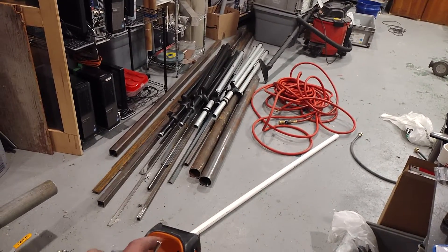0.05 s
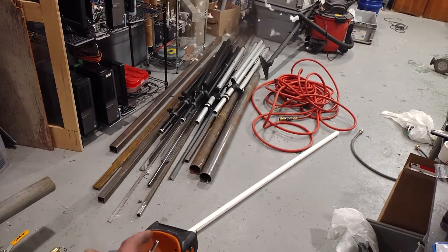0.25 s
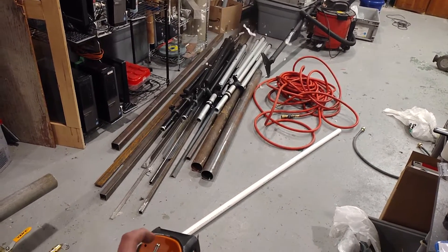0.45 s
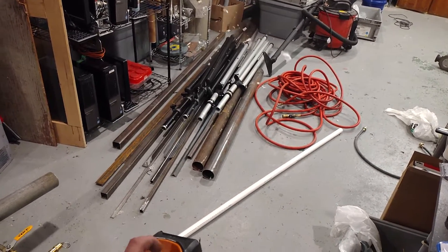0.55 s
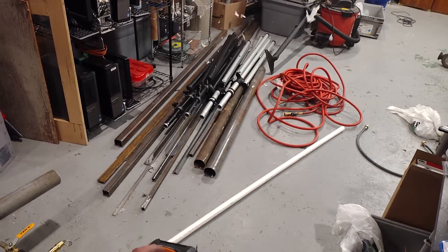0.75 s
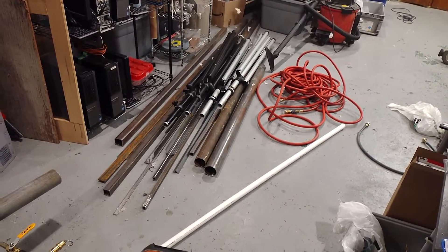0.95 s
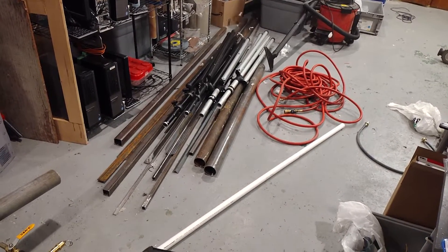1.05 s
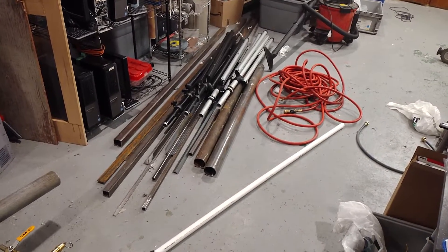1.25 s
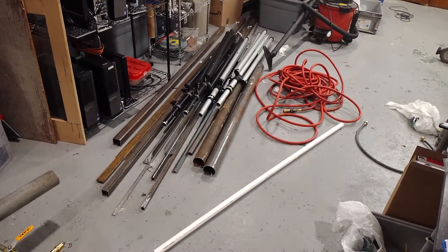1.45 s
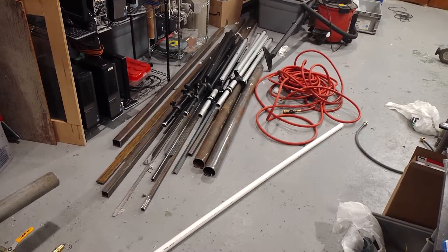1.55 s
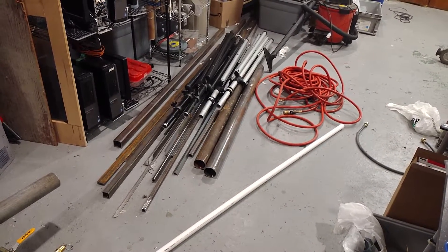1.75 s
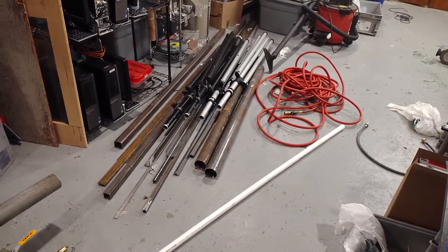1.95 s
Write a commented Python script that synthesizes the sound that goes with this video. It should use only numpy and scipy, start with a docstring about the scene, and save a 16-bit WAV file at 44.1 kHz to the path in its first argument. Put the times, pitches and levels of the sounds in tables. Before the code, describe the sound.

A compressed-air launcher clicks and fires with a sharp pop and a rushing blast that darkens into a pipe rumble. Steel rings and light debris ticks down, then a valve snaps and vents a brighter hiss, close by in a workshop.

```python
"""Compressed-air launcher in a workshop

A trigger valve snaps and a pressure pulse leaves the barrel. The turbulent blast darkens into a pipe
rumble as the tank empties. A struck steel part rings, its close modes beating, and light debris lands.
The valve snaps again and vents a second, brighter hiss. Faint room noise and hum lie underneath."""
import sys
import numpy as np
from scipy import signal
from scipy.fft import rfft, irfft, next_fast_len
from scipy.io import wavfile
from scipy.ndimage import map_coordinates

SR = 44100
rng = np.random.default_rng(int(sys.argv[2]) if len(sys.argv) > 2 else 0)


def materialize(psi):
    """Save the field psi as 16-bit PCM at rate SR to the path in sys.argv[1].

    A 1-D psi becomes a single channel; in a 2-D psi each row is a channel.
    """
    bounded = np.clip(np.atleast_2d(psi).T, -1, 1)
    quanta = np.round(bounded * 32767).astype(np.int16)
    wavfile.write(sys.argv[1], SR, quanta)


N = 88200


def amp(db):
    """Amplitude ratio of a level in decibels."""
    return 10 ** (np.asarray(db) / 20)


def along(table, hz, column=1):
    """Interpolation of one column on a log-frequency axis."""
    columns = np.transpose(table)
    return np.interp(np.log(hz + 1), np.log(columns[0] + 1), columns[column])


def since(start):
    """Seconds elapsed since start, zero before."""
    return np.maximum(np.arange(N) / SR - start, 0)


def decay(start, t60, attack=.0008):
    """Exponential damping after a blow: 60 dB lost in t60 seconds."""
    return amp(-60 * since(start) / t60) * (1 - np.exp(-since(start) / attack))


def sine(hz, start, phase=0):
    """Simple harmonic motion from start, phase in radians."""
    return np.sin(2 * np.pi * hz * since(start) + phase)


def wobble(rate):
    """Smooth random modulation, rate knots a second."""
    return map_coordinates(rng.standard_normal(1024), [since(0) * rate], mode="wrap")


def pan(db):
    """Stereo gains for a left-minus-right level difference."""
    return amp(np.array([[.5], [-.5]]) * db)


def resonances(peaks, hz):
    """Gain in dB of a set of Lorentzian peaks."""
    return sum(db / (1 + (2 * (hz - centre) / width) ** 2) for centre, width, db in peaks)


def filtered(x, response):
    """Linear filtering: the spectrum times a frequency response."""
    size = next_fast_len(N + SR // 2)
    return irfft(rfft(x, size) * response(np.fft.rfftfreq(size, 1 / SR)), size)[..., :N]


def damped(x, loss_db):
    """Attenuation that depends on frequency and time."""
    hz, t, spectra = signal.stft(x, SR, nperseg=256)
    return signal.istft(spectra * amp(-loss_db(hz[:, None], t)), SR, nperseg=256)[1][:, :N]


# Each row: frequency in Hz, correlation of left and right.
COHERENCE = [(60, .96), (150, .87), (300, .82), (450, .3), (700, -.1), (2000, 0)]
def noise(colour_db, balance=None):
    """Stereo noise of rms 1 with a given spectral shape, coherent only at long wavelengths."""
    def mid_side_gains(hz):
        angle = np.arccos(np.clip(along(COHERENCE, hz), -1, 1)) / 2
        return amp(colour_db(hz)) * [np.cos(angle), np.sin(angle)]
    mid, side = filtered(rng.standard_normal((2, N)), mid_side_gains)
    pair = np.array([mid + side, mid - side])
    if balance:
        pair = filtered(pair, lambda hz: pan(along(balance, hz)))
    return pair / np.sqrt(np.mean(pair ** 2) + 1e-20)


def band(centre, octaves):
    """Band-pass noise, at half power the given octaves either side of the centre."""
    return noise(lambda hz: -10 * np.log10(1 + (np.log2((hz + 1) / centre) / octaves) ** 4))


# Each row: frequency in Hz, reverberation time in seconds.
REVERB_TIMES = [(100, .5), (1000, .4), (5000, .28), (15000, .18)]
def room(direct, wet_db):
    """Reverberation: a diffuse tail follows the direct sound, its treble dying first."""
    tail = damped(noise(np.zeros_like), lambda hz, t: 60 * t / along(REVERB_TIMES, hz))[:, :SR // 2]
    tail[:, :SR // 250] = 0  # reflections begin after 4 ms
    tail /= np.linalg.norm(tail[0])
    return direct + amp(wet_db) * signal.fftconvolve(direct * np.ones((2, 1)), tail, axes=1)[:, :N]


# Each row: frequency in Hz, relative spectral density in dB.
AMBIENT_SPECTRUM = [(30, -38), (110, -9), (260, -4), (640, -11), (1900, -18.5), (3900, -21),
                    (5300, -29), (15500, -35)]
def background():
    """Noise floor: steady broadband room noise and a tone of mains hum."""
    return amp(-59.3) * noise(lambda hz: along(AMBIENT_SPECTRUM, hz)) + amp(-73) * sine(hz=120, start=0)


# Each row: start in seconds, level in dB, t60 in seconds, centre in Hz, half-width in octaves. The first row is
# the blow that sets the steel part ringing.
IMPACTS = [(.533, -35, .22, 13000, .25), (.647, -43, .08, 7000, .7), (.666, -39, .22, 4500, 1.2),
           (.847, -39, .1, 6500, .3), (.848, -41.5, .12, 6500, 1.4), (.999, -40, .2, 12000, 1),
           (1.021, -41, .08, 7000, 1), (1.3214, -59, .14, 6000, 1)]
def debris():
    """Impact noise: the first bright tick is the blow on the steel part, and each light piece then lands with a
    bright, quickly damped tick."""
    return sum(amp(db) * decay(start, t60) * band(centre, octaves)
               for start, db, t60, centre, octaves in IMPACTS)


# Each row: start in seconds, level in dB, attack and t60 in seconds, frequency in Hz.
BUMPS = [(1.105, -31.5, .03, .28, 134), (1.523, -36, .001, .1, 115)]
def thuds():
    """Damped bass oscillations: a distant bump, then the valve seating."""
    return sum(amp(db) * decay(start, t60, attack) * sine(hz, start)
               for start, db, attack, t60, hz in BUMPS)


# Modes of the steel part. Each row: frequency in Hz, level in dB, t60 in seconds.
CLOSE_MODES = [(1896.8, -34.3, 2.0), (1899.5, -37.1, 2.26), (1912.5, -36.9, 2.26)]
SPREAD_MODES = [(1184, -32, .5), (1389, -37, 1.2), (1523, -37, 1.5), (2541, -37, 1.2), (4620, -55, 2)]
def steel(strike=.533):
    """Free vibration: three close modes interfere in uneven beats while most others die sooner."""
    beating = sum(amp(db) * decay(strike, t60) * sine(hz, strike) for hz, db, t60 in CLOSE_MODES)
    clang = sum(amp(db) * decay(strike, t60) * sine(hz, strike, np.pi * rng.random((2, 1)))
                for hz, db, t60 in SPREAD_MODES)
    return beating * pan(-7) + clang


# Each row: frequency in Hz, relative spectral density in dB.
RUMBLE_SPECTRUM = [(25, -30), (65, -8), (150, 1), (290, -5), (450, -11), (700, -16.5), (1200, -15),
                   (2600, -19), (4500, -34), (15000, -48)]
# Each row: frequency in Hz, level in dB, t60 in seconds.
BARREL_MODES = [(122, -28, 1.25), (235, -25, .7)]
def barrel_rumble(start=.41, peak=.52, fade_db_per_s=34):
    """Pipe resonance: the slowing air swells into a rumble and drives the barrel's low modes."""
    swell = np.minimum(since(start) / (peak - start), 1)
    roar = amp(-26 - fade_db_per_s * since(peak)) * noise(lambda hz: along(RUMBLE_SPECTRUM, hz))
    drone = 0
    for hz, db, t60 in BARREL_MODES:
        envelope = amp(db - 60 * since(peak) / t60 + 2.5 * wobble(rate=14))
        drone += envelope * sine(hz, start, phase=.5 * wobble(rate=14))
    return swell * (roar + drone)


# Each row: frequency in Hz, relative spectral density in dB.
SNAP_SPECTRUM = [(60, -10), (350, -2), (850, -15), (1700, -3), (2600, 2), (7000, -3), (10000, -1),
                 (15500, -5)]
# Each row: centre and bandwidth in Hz, boost in dB.
VALVE_RESONANCES = [(4300, 600, 6), (5400, 350, 4), (10400, 1300, 6)]
# Each row: start in seconds, level in dB, t60 in seconds, cutoff in Hz, ring in Hz, ring level in dB.
VALVE_SNAPS = [(.1945, -45, .03, 3000, 3500, -52), (.2078, -19, .035, 14000, 3000, -27.5),
               (1.4795, -30.5, .035, 2600, 2200, -46), (1.4865, -34.5, .16, 4000, 10400, -43),
               (1.526, -28, .08, 4000, 4500, -36)]
def valve():
    """Impulsive excitation: each movement of the valve snaps and leaves its metal ringing."""
    def snap(cutoff):
        return noise(lambda hz: along(SNAP_SPECTRUM, hz) + resonances(VALVE_RESONANCES, hz)
                     - 10 * np.log10(1 + (hz / cutoff) ** 2))
    snaps = sum(amp(db) * decay(start, t60, attack=.0003) * snap(cutoff)
                for start, db, t60, cutoff, _, _ in VALVE_SNAPS)
    ringing = sum(amp(db) * decay(start, t60=.14) * band(hz, octaves=.2)
                  for start, *_, hz, db in VALVE_SNAPS)
    return snaps + ringing


def jet(spectrum, balance, start, attack, hold, db, peaks=()):
    """Turbulent jet noise: it opens fast, sags and darkens with the pressure, then dies away."""
    def loss_db(hz, t):
        sag = along(spectrum, hz, column=2) * np.clip(t - start, 0, hold)
        release = along(spectrum, hz, column=3) * np.maximum(t - start - hold, 0)
        return sag + release
    rush = noise(lambda hz: along(spectrum, hz) + resonances(peaks, hz), balance)
    opening = np.minimum(since(start) / attack, 1)
    flutter_db = .8 * wobble(rate=70)
    return damped(rush, loss_db) * opening * amp(db + flutter_db)


# Each row: frequency in Hz, relative spectral density in dB, sag and release in dB per second.
VENT_SPECTRUM = [(50, -34, 10, 20), (170, -23, 15, 20), (450, -7.5, 68, 110), (680, -18, 32, 110),
                 (1600, -6.5, 44, 180), (2200, -1.5, 52, 220), (4400, -.5, 61, 310), (7800, -2.5, 58, 340),
                 (9000, -8, 60, 400), (15500, -9, 72, 540)]
# Each row: frequency in Hz, left minus right in dB.
VENT_BALANCE = [(400, 1), (1400, 0), (2300, -5), (4500, -4), (5800, 3), (9000, 7), (15000, 3)]
# Each row: centre and bandwidth in Hz, boost in dB.
PORT_RESONANCES = [(2225, 85, 7.5), (3700, 130, 6), (3880, 45, 7), (4550, 140, 7.5), (4735, 45, 8),
                   (7630, 60, 6), (7880, 60, 4)]
def vent(start=1.53, surge_db=3.7, surge_s=.088):
    """Resonant filtering: the vent port colours a bright jet that opens with a surge."""
    hiss = jet(VENT_SPECTRUM, VENT_BALANCE, start, attack=.013, hold=.212, db=-14.2,
               peaks=PORT_RESONANCES)
    surge = amp(surge_db * np.exp(-(since(start) / surge_s) ** 4))
    return surge * hiss * pan(-1)


# Each row: frequency in Hz, level in dB, t60 in seconds.
MUZZLE_MODES = [(100, -19, .07), (355, -11.5, .065), (462, -16, .055), (822, -12, .04)]
def muzzle_pulse(start=.2546, echo_s=.0028):
    """A compression inside a wider rarefaction reflects off the floor; the muzzle rings briefly."""
    def pressure(t):
        compression = np.exp(-.5 * (t / .001) ** 2)
        rarefaction = .34 * np.exp(-.5 * (t / .003) ** 2)
        return compression - rarefaction
    t = since(0) - start
    pop = sum(amp(db) * decay(start, t60) * sine(hz, start) for hz, db, t60 in MUZZLE_MODES)
    return amp(-2) * (pressure(t) + .25 * pressure(t - echo_s)) + pop


# Each row: frequency in Hz, relative spectral density in dB, sag and release in dB per second.
BLAST_SPECTRUM = [(40, -20, 55, 60), (120, -8, 58, 50), (190, -7, 45, 50), (320, 3, 35, 65),
                  (680, -7, 15, 85), (1100, 0, 21, 85), (2200, -2.3, 20, 95), (4000, 3, 53, 190),
                  (6500, -.5, 68, 230), (10000, -7.3, 76, 210), (15500, -12.5, 80, 170)]
# Each row: frequency in Hz, left minus right in dB.
BLAST_BALANCE = [(100, 1), (500, 2), (1500, -1), (3600, -4), (6000, 1), (12000, 1)]
def blast(start=.2545, attack=.005):
    """Discharge of a pressure tank: a brief leak gives way to the main jet."""
    leak = jet(BLAST_SPECTRUM, BLAST_BALANCE, start=.234, attack=.005, hold=.018, db=-23.5)
    discharge = jet(BLAST_SPECTRUM, BLAST_BALANCE, start, attack, hold=.262, db=-10.5)
    until_open = since(start + attack) == 0
    return leak * until_open + discharge


def scene():
    """Superposition of all sources; the jets, pulse, snaps and debris reverberate."""
    jets = room(blast() + vent(), wet_db=-7)
    launcher = jets + room(muzzle_pulse(), wet_db=-15) + room(valve(), wet_db=-4) + barrel_rumble()
    return launcher + thuds() + steel() + room(debris(), wet_db=-4) + background()


PEAK_LIMIT, TOP_HZ = .96, 15900
def record(dry):
    """Soft saturation rounds the highest peaks; a low-pass filter limits the bandwidth."""
    rounded = dry / (1 + (dry / PEAK_LIMIT) ** 6) ** (1 / 6)
    return filtered(rounded, lambda hz: np.clip((TOP_HZ - hz) / 300 + .5, 0, 1))


dry = scene()
out = record(dry)
materialize(out)
```